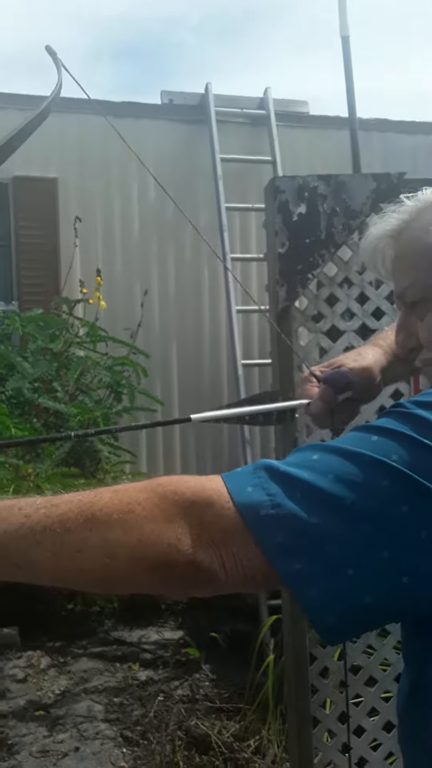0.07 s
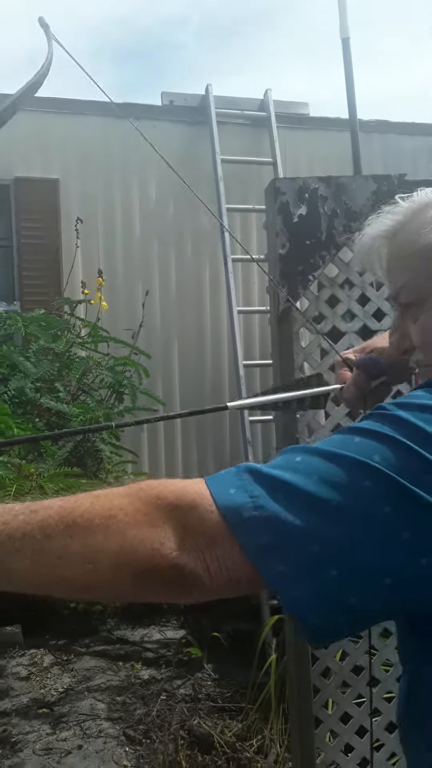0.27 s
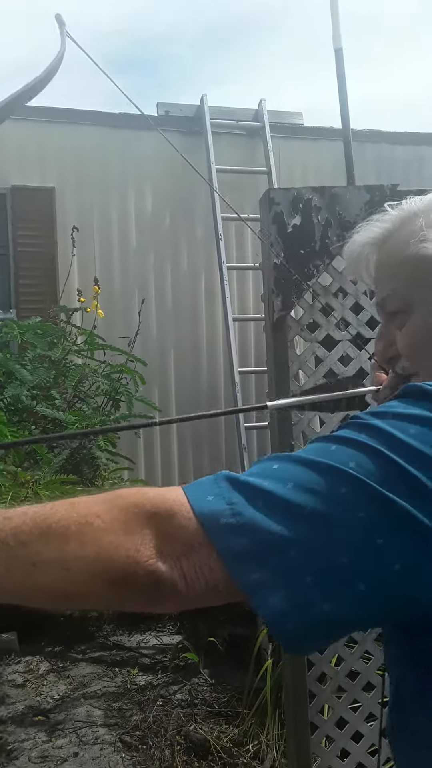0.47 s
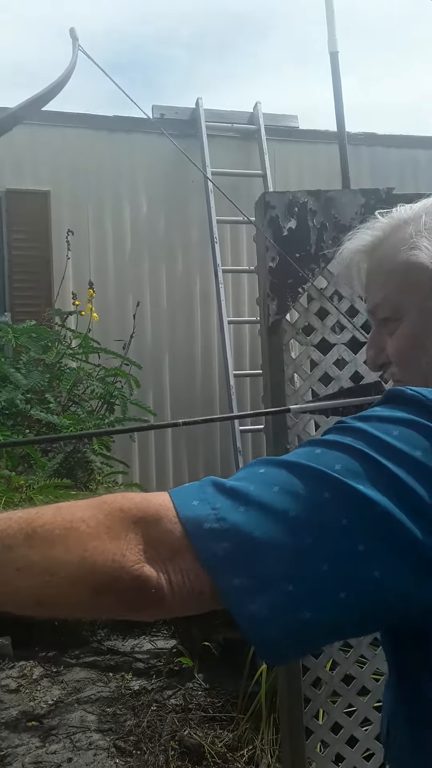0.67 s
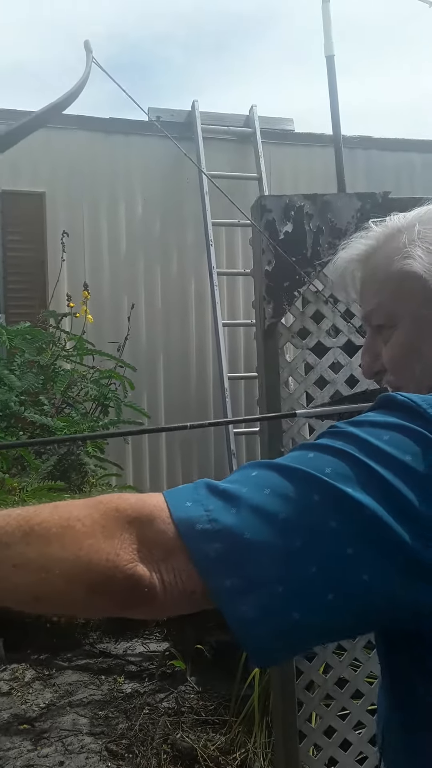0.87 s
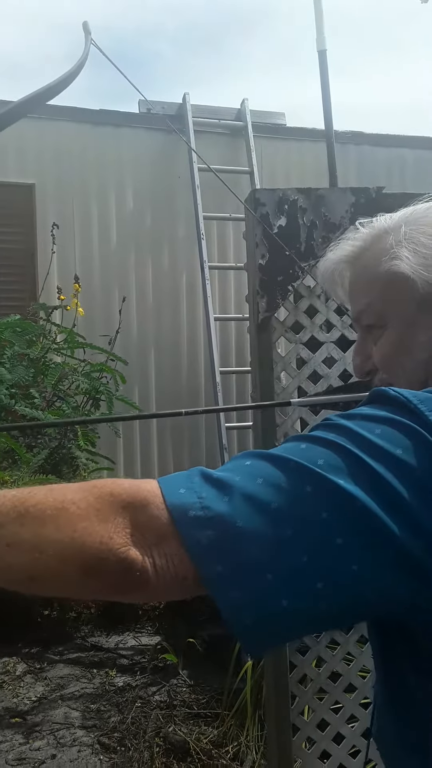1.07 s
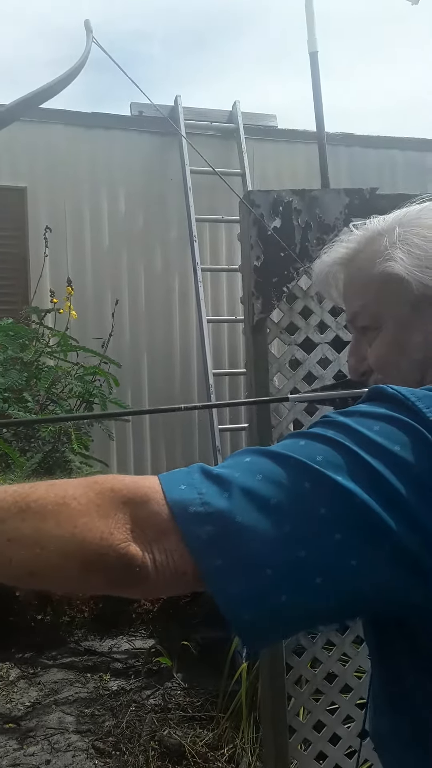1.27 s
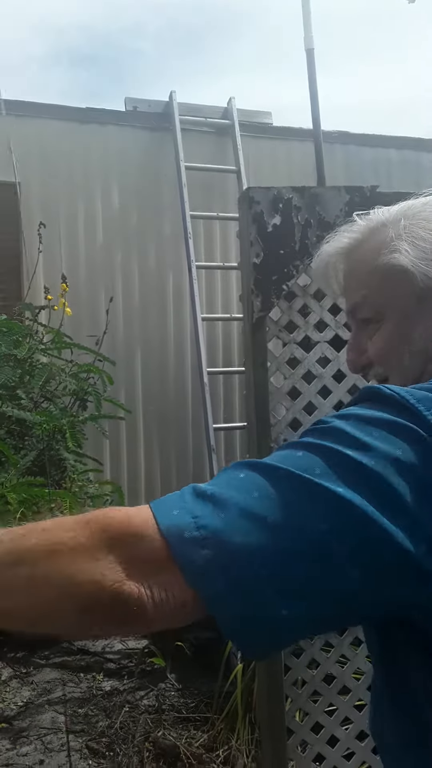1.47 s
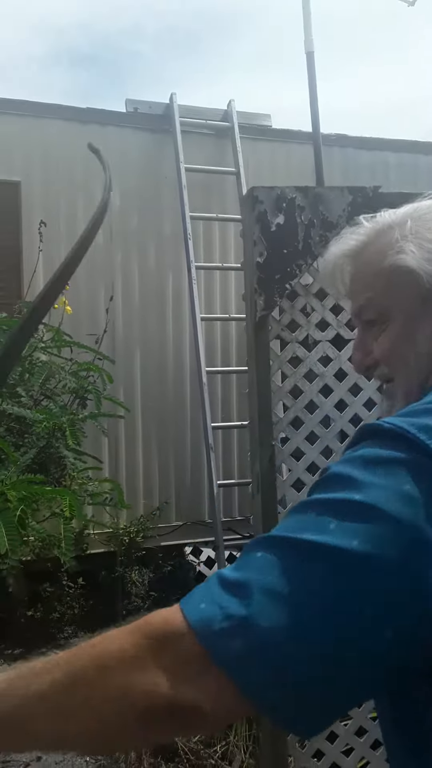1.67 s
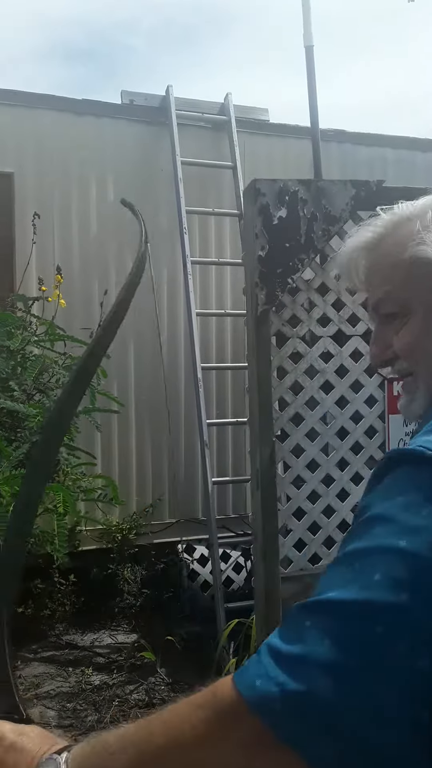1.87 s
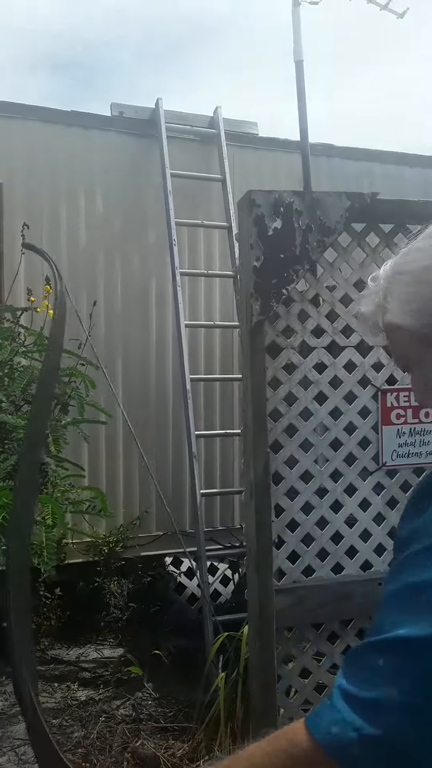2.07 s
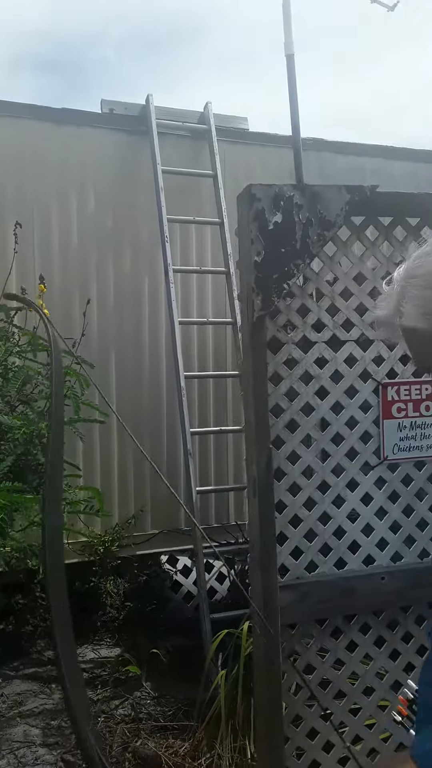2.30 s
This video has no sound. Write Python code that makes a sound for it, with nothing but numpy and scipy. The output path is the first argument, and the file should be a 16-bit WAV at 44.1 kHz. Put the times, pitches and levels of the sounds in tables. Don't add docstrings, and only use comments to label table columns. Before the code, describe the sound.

A bowstring snaps with a sharp, rattling twang, then an arrow cracks into a hollow block outdoors

```python
import sys
import numpy as np
from scipy import signal
from scipy.fft import rfft, irfft, next_fast_len
from scipy.io import wavfile
from scipy.ndimage import uniform_filter1d

SR = 44100
rng = np.random.default_rng(int(sys.argv[2]) if len(sys.argv) > 2 else 0)


def master_out(mix):
    frames = np.transpose(np.atleast_2d(mix))
    ceiling = np.clip(frames, -1, 1)
    pcm = np.round(ceiling * 32767).astype(np.int16)
    wavfile.write(sys.argv[1], SR, pcm)


def voltage_ratio(level):
    return 10 ** (np.asarray(level, float) / 20)


N = 103061

# (time [s], level [dB], fade [s], left-right [dB], weight on the handle [dB])
SLAPS = [(1.4211, -39.5, 0.012, 4, 7), (1.4391, -17.5, .004, -0.5, -1), (1.4394, -18, 0.0038, 2, -4),
         (1.4435, -26, 0.0064, 0, 2), (1.4514, -15.5, 0.0043, 0, -2.5), (1.4536, -10.5, 0.0039, -1, -2),
         (1.456, -26, 0.0068, 0.5, -4), (1.4592, -11, 0.0044, -4, -3.5), (1.4625, -17, 0.0075, 6, 2),
         (1.4637, -21, .006, 4, 3), (1.4672, -23.5, 0.01, 1.5, 4), (1.474, -22, 0.008, 3, 6),
         (1.4803, -24, 0.0054, -4.5, 4.5), (1.485, -31.5, .01, 3, 7.5), (1.4905, -32.5, .008, 2.5, 8.5),
         (1.4955, -38, .01, 3, 6), (1.503, -36, 0.016, 1, 6), (1.512, -35, .012, 4, 8.5)]
# (frequency [Hz], width [Hz], level [dB])
LIMB_MODES = [(3330, 530, 3.5), (3950, 690, -1.5), (4510, 700, 4), (5620, 1800, -5.5), (7200, 1300, -9),
              (8300, 1300, -15.5), (10020, 800, -12.5), (12000, 980, -15)]
# (frequency [Hz], width [Hz], level [dB])
HANDLE_MODES = [(480, 78, -11.5), (787, 300, -14.5), (1095, 82, -13.5), (1300, 110, -3.5), (1780, 400, -7),
                (2250, 500, -7.5)]
# (frequency [Hz], width [Hz], level [dB])
SNAP_MODES = [(14000, 3200, -25.5)]
# (frequency [Hz], width [Hz], level [dB])
WHIRR_BANDS = [(467, 380, 1.5), (753, 170, -4), (1020, 120, 1)]
# (time [s], level [dB], fade [s], left-right [dB])
TICKS = [
    (.966, -49, 0.0095, 0),
    (.976, -53, 0.0094, -2.5),
    (1.4222, -33, 0.0055, -2),
]
# (frequency [Hz], width [Hz], level [dB])
TICK_MODES = [(2264, 500, 4), (3566, 600, -1)]
# (frequency [Hz], width [Hz], level [dB])
SLAP_SCATTER = [(2480, 1500, -13), (3900, 1800, -6.5), (5800, 2000, -9), (14000, 2500, -29)]
# (time [s], level [dB], fade [s], left-right [dB])
THUDS = [
    (1.7901, -19.5, 0.0048, 1),
    (1.7909, -16.5, 0.0037, -5.5),
    (1.796, -25, 0.005, -3.5),
    (1.8015, -27.5, .006, -2),
    (1.809, -45, 0.011, 8),
    (1.818, -34, 0.017, -9),
]
# (frequency [Hz], width [Hz], level [dB])
FACE_MODES = [(720, 113, 2), (1274, 118, -5), (1468, 171, 2.5), (1699, 124.4, 2), (1920, 172, 2.5),
              (2255, 170, -7), (2593, 299, -12), (4040, 557, -12)]
# (frequency [Hz], width [Hz], level [dB])
CRACK_MODES = [(5250, 650, -25), (6100, 600, -15.5), (7520, 1200, -23), (10380, 1100, -25),
               (13200, 1100, -23.5), (15000, 900, -26)]
# (frequency [Hz], level [dB], 60 dB decay [s], swell [s])
BODY_MODES = [(112.6, -16, 0.061, 0.0068), (227, -17, 0.038, 0.0017), (428, -22.5, 0.039, 0.00047),
              (1633, -43, 0.28, .006), (1427, -52, .12, 0.0035), (814, -42, 0.18, .004)]
# (frequency [Hz], width [Hz], level [dB])
CRACK_SCATTER = [(3283, 1800, -16.5), (6070, 4300, -25), (12580, 5000, -33)]
# (frequency [Hz], 60 dB decay [s])
BOW_YARD = [(500, 0.22), (1500, 0.26), (4000, .2), (8000, 0.13), (13000, 0.11)]
# (frequency [Hz], 60 dB decay [s])
BLOCK_YARD = [(300, 0.31), (1500, 0.25), (4000, 0.28), (8000, 0.21), (13000, 0.16)]
# (frequency [Hz], 60 dB decay [s])
FAR_WALLS = [(500, .45), (2000, 0.7), (3300, 0.49), (5000, 0.46), (8500, 0.41), (14000, 0.27)]
# (time [s], length [s], start [Hz], end [Hz], level [dB])
SQUEAKS = [
    (0.02, 0.18, 7400, 6600, -73.5),
    (0.146, 0.19, 5270, 7160, -64.5),
    (0.319, 0.15, 5800, 7300, -66.5),
    (0.46, 0.14, 5600, 7080, -67),
]
# (time [s], length [s], frequency [Hz], level [dB])
BIRDS = [(0, 0.019, 2330, -57), (0.014, 0.062, 3660, -63), (0.04, 0.045, 2930, -67), (.19, 0.11, 4270, -65),
         (0.238, 0.1, 3790, -62.5), (0.516, 0.082, 3710, -63.5), (0.57, 0.081, 2975, -67.5),
         (0.607, 0.029, 3780, -62), (1.11, 0.13, 3806, -67), (2.16, .06, 2290, -72),
         (2.237, 0.092, 2260, -69.5), (1.977, 0.088, 3950, -77)]
# (time [s], recorder gain [dB], leaf rustle [dB])
GAIN = [(0, 2, -62), (.4, -1, -60.5), (.7, -0.52, -69), (1.4, -2, -64.5), (1.5, 2, -74),
        (1.621, -5.5, -98.5), (1.781, -7, -84), (1.86, -3, -78), (1.97, -10, -77.5), (2.13, -11, -67),
        (2.34, -10, -69.5)]
# (frequency [Hz], level [dB per Hz])
RUSTLE = [(500, -13), (1200, 1), (2500, -3), (4000, -2.5), (7000, -22), (12000, -25), (15700, -26.5),
          (15950, -70.5)]
# (frequency [Hz], level [dB per Hz])
HUM = [(15, -66.5), (25, -43.5), (55, -14.5), (216, 3.5), (349, -7.5), (410, -7.5), (528, -18),
       (664, -11.5), (6000, -42), (7800, -70), (13200, -120)]
# (frequency [Hz], width [Hz], level [dB])
DRONE = [(68.5, 33, -56.5), (174, 29, -52), (232.8, 40, -53.5), (447, 140, -57.5)]
# (frequency [Hz], level [dB per Hz])
HISS = [(3500, -21.5), (5000, -4.5), (7500, -6.5), (10000, -5), (13000, -0.5), (15700, 1), (16000, -36)]
# (frequency [Hz], left-right likeness [0 to 1])
LIKENESS = [(60, 0.787), (180, .99), (550, 0.79), (1650, .8), (4970, 0.18), (15000, 0.27)]
# (frequency [Hz], left-right [dB])
PORTS = [(200, 0), (700, -1), (1500, -2.5), (3000, -4), (4500, -8), (6200, -3), (8500, 1), (13000, -2)]

WHIRR_S, WHIRR_LENGTH_S, WHIRR_DB = 1.4205, 0.1, -34.5
SHUDDER_S, SHUDDER_LENGTH_S, SHUDDER_HZ, SHUDDER_DB = 1.3, 0.075, 64, -43
BOW_TOP_HZ, BOW_RATTLE, BOW_ECHO_DB, FAR_DB = 13020, 0.79, -11.5, -27.5
PUSH_S, PUSH_RISE_S = 1.7924, 0.0019
BLOCK_RATTLE, BLOCK_ECHO_DB = 0.48, -10
SQUEAK_STEP_HZ = 740
HUM_DB, HISS_DB = -46, -70.5
HISS_SHARE = 0.88
BLOW_LIKENESS = 0.56
BOW_LAG, BLOCK_LAG, FAR_LAG = -4, -2.5, -4.5
NEAR_MONO_HZ = 900
LOW_CUT_HZ, MIC_TOP_HZ, CEILING = 50, 16100, 1.3


def bow():
    u = np.clip((np.arange(N) / SR - WHIRR_S) / WHIRR_LENGTH_S, 0, 1)
    air = pair(0.95)
    whirr = evened(sum(voltage_ratio(db) * ring(air, hz, width) for hz, width, db in WHIRR_BANDS))
    whirr = voltage_ratio(WHIRR_DB) * np.minimum(u / 0.034, 1) * (1 - u) ** 2 * whirr
    on_limbs = [row[:4] for row in SLAPS]
    on_handle = [(s, db + weight, fade, 0) for s, db, fade, _, weight in SLAPS]
    slaps = blows(on_limbs, LIMB_MODES, BOW_RATTLE) + blows(on_handle, HANDLE_MODES)
    snap = blows(on_limbs[:5], SNAP_MODES)
    direct = dull(slaps, BOW_TOP_HZ) + whirr
    thrown = direct / 2 + blows(on_limbs, SLAP_SCATTER)
    near_walls = voltage_ratio(BOW_ECHO_DB) * yard(thrown, BOW_YARD, 0.015)
    far_walls = voltage_ratio(FAR_DB) * yard(thrown, FAR_WALLS, 0.061)
    return direct + snap + blows(TICKS, TICK_MODES) + shudder() + near_walls + far_walls


def shudder():
    u = np.clip((np.arange(N) / SR - SHUDDER_S) / SHUDDER_LENGTH_S, 0, 1)
    swing = np.sin(2 * np.pi * SHUDDER_HZ * SHUDDER_LENGTH_S * u)
    return voltage_ratio(SHUDDER_DB) * np.sin(np.pi * u) ** 2 * swing


def block():
    t = np.arange(N) / SR - PUSH_S
    age = np.maximum(t + PUSH_RISE_S, 0)
    boom = 0
    for hz, db, t60, swell in BODY_MODES:
        envelope = (1 - np.exp(-age / swell)) * voltage_ratio(db - 60 * age / t60)
        boom = boom + envelope * np.cos(2 * np.pi * hz * t)
    face = blows(THUDS, FACE_MODES, BLOCK_RATTLE)
    crack = blows(THUDS[:3], CRACK_MODES, 0.85)
    thrown = face + blows(THUDS, CRACK_SCATTER) + boom / 4
    return face + crack + boom + voltage_ratio(BLOCK_ECHO_DB) * yard(thrown, BLOCK_YARD, 0.0089)


def blows(hits, modes, rattle=1):
    first = round(hits[0][0] * SR) - 50
    t, burst, clicks = np.arange(first, N) / SR, 0, 0
    for s, db, fade_s, pan_db in hits:
        age = np.maximum(t - s, 0)
        sides = voltage_ratio([[pan_db / 2], [-pan_db / 2]])
        burst = burst + np.minimum(age / 0.0002, 1) * voltage_ratio(db - 20 * age / fade_s) * sides
        clicks = clicks + voltage_ratio(db) * sides * np.exp(-((t - s) * SR) ** 2)
    drive = rattle * burst * pair(BLOW_LIKENESS)[:, first:] + 4 * clicks
    rung = 0
    for k, (hz, width, db) in enumerate(modes):
        rung = rung + 3 * (-1) ** k * voltage_ratio(db) * ring(drive, hz, width, 1.9)
    return np.pad(rung, [(0, 0), (first, 0)])


def ring(x, hz, width, wider=1):
    for w in (width, wider * width):
        r = np.exp(-np.pi * w / SR)
        x = signal.lfilter([1 - r], [1, -r * np.exp(2j * np.pi * hz / SR)], x + 1e-18)
    return 2 * x.real


def yard(x, decays, delay_s):
    taps = np.zeros((2, SR))
    at = np.arange(0, SR - 20, 20) + rng.integers(0, 20, (2, (SR - 1) // 20))
    np.put_along_axis(taps, at, rng.choice([-1., 1.], at.shape), 1)
    taps *= np.clip(np.arange(SR) / SR / delay_s, 0, 1) ** 2
    hz, t, z = signal.stft(taps, SR, nperseg=256)
    decay = voltage_ratio(-60 * t / read(decays, hz)[:, None])
    tail = signal.istft(z * decay, SR, nperseg=256)[1]
    return signal.fftconvolve(x, tail / np.linalg.norm(tail[0]), axes=1)[:, :N]


def whistles():
    t, out, air = np.arange(N) / SR, np.zeros((2, N)), pair(0.78)
    grain = voltage_ratio(2.0 * evened(uniform_filter1d(rng.standard_normal(N), size=500)))
    for s, length, from_hz, to_hz, db in SQUEAKS:
        u = np.clip((t - s) / length, 0, 1)
        hz = from_hz + SQUEAK_STEP_HZ * np.round((to_hz - from_hz) * u / SQUEAK_STEP_HZ)
        squeak = evened(resonate(resonate(air, hz, 1400), hz, 1400))
        out += voltage_ratio(db) * grain * np.sin(np.pi * u) ** 0.9 * squeak
    for s, length, hz, db in BIRDS:
        arch = np.sin(np.pi * np.clip((t - s) / length, 0, 1)) ** 0.52
        out += voltage_ratio(db) * grain * arch * evened(ring(air, hz, 160))
    return out


def resonate(x, hz, width):
    turn = np.exp(2j * np.pi * np.cumsum(hz * np.ones(N)) / SR)
    r = np.exp(-np.pi * width / SR)
    return 2 * (turn * signal.lfilter([1 - r], [1, -r], x / turn + 1e-18)).real


def outdoors():
    s, gain_db, rustle_db = np.transpose(GAIN)
    t, air = np.arange(N) / SR, pair(1.0)
    gain_db = np.interp(t, s, gain_db)
    drone = sum(voltage_ratio(db) * evened(ring(air, hz, width)) for hz, width, db in DRONE)
    floor = (bed(HUM, HUM_DB, 1.5) + drone) * voltage_ratio(gain_db)
    hiss = bed(HISS, HISS_DB, 0.8) * voltage_ratio(HISS_SHARE * gain_db)
    rustle = bed(RUSTLE, 0, 2.8) * voltage_ratio(np.interp(t, s, rustle_db))
    return hiss + floor + rustle


def bed(spectrum, db, patchy_db):
    frames, hz = N // 256 + 5, np.fft.rfftfreq(1024, 1 / SR)
    a, b, c, d, patches = rng.standard_normal((frames, 513, 5)).T
    patches = uniform_filter1d(patches, size=10, axis=0)
    patches = evened(uniform_filter1d(patches, size=12, axis=1))
    same = read(LIKENESS, hz)[:, None]
    left = a + 1j * b
    z = np.array([left, same * left + np.sqrt(1 - same ** 2) * (c + 1j * d)])
    z *= voltage_ratio(read(spectrum, hz)[:, None] + patchy_db * patches)
    return voltage_ratio(db) * evened(signal.istft(z, nperseg=1024, noverlap=768)[1][:, :N])


def pair(alike):
    a, b = rng.standard_normal((2, N))
    return np.array([a, alike * a + np.sqrt(1 - alike ** 2) * b])


def evened(x):
    return x / np.sqrt(np.mean(x ** 2) + 1e-20)


def read(points, hz):
    f, value = np.transpose(points)
    return np.interp(np.log(hz + 1), np.log(f + 1), value)


def ports(x, colour, lag, mono_hz):
    size = 2 * next_fast_len(N // 2 + 1024)
    hz = np.fft.rfftfreq(size, 1 / SR)
    left, right = rfft(x, size)
    mid = (left + right) / 2
    side = (left - right) / 2 * 1j * hz / (mono_hz + 1j * hz)
    tilt = causal(colour * read(PORTS, hz) / 2)
    delay = np.exp(-2j * np.pi * hz * lag / SR)
    return irfft([(mid + side) * tilt * delay, (mid - side) / tilt], size)[:, :N]


def causal(db):
    log_gain = np.log(voltage_ratio(np.concatenate([db, db[-2:0:-1]])))
    return np.exp(np.conj(signal.hilbert(log_gain)))[:len(db)]


def dull(x, hz):
    return signal.sosfilt(signal.butter(10, hz, fs=SR, output="sos"), x)


def scene():
    near = ports(bow(), 1, BOW_LAG, NEAR_MONO_HZ) + ports(block(), 0.59, BLOCK_LAG, NEAR_MONO_HZ)
    far = ports(whistles() + outdoors(), 0.029, FAR_LAG, 100.3)
    return near + voltage_ratio([[0.3], [-0.3]]) * far


def low_pass(x):
    return signal.sosfilt(signal.butter(12, 16570, fs=SR, output="sos"), x)


def record(dry):
    cut = signal.sosfilt(signal.butter(3, LOW_CUT_HZ, "high", fs=SR, output="sos"), dry)
    mix = dull(CEILING * np.tanh(cut / CEILING), MIC_TOP_HZ)
    return low_pass(mix)


dry = scene()
out = record(dry)
master_out(out)
```